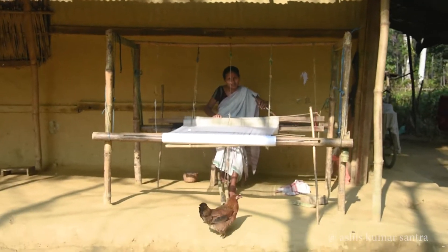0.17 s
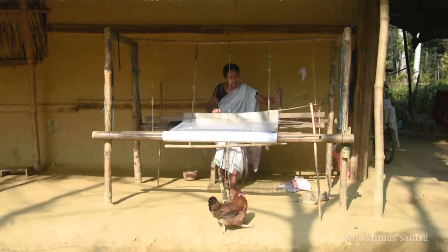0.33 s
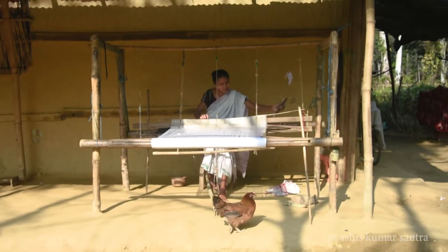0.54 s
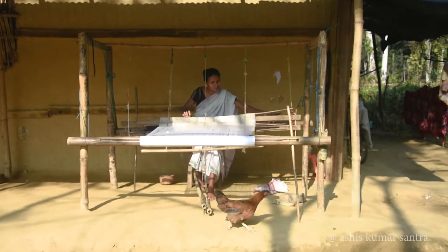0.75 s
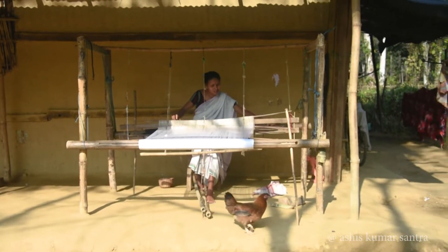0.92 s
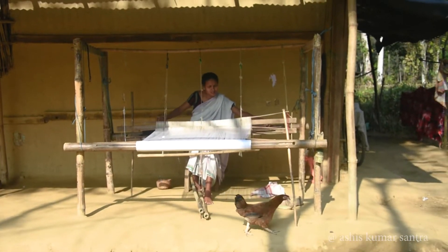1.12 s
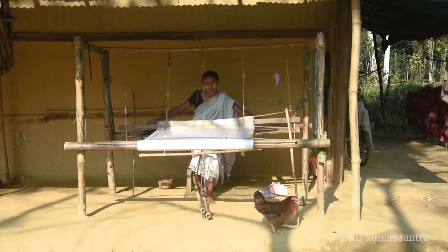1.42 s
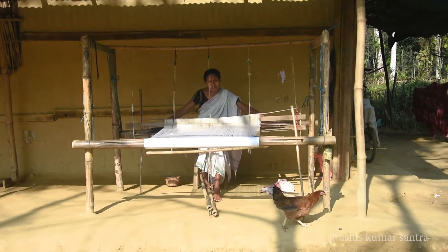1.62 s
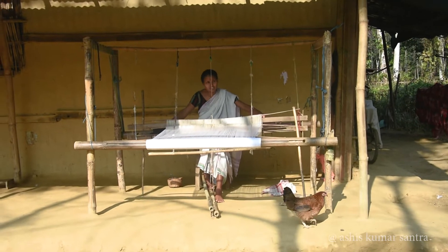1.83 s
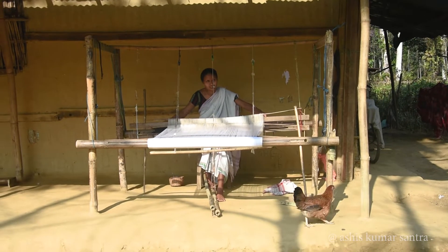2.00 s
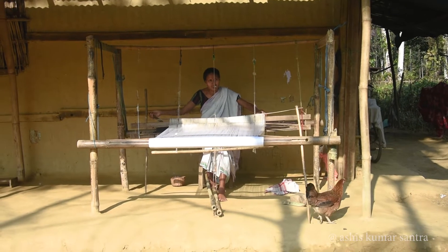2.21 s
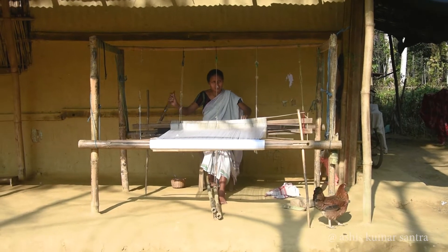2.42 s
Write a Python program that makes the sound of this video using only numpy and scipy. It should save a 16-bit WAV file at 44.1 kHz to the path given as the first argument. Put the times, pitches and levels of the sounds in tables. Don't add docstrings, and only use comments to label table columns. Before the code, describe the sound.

A wooden handloom, close and dry on an open veranda. A tiny hen cluck and stick tick at 0.03 s; a loud, ringing knock at 0.23 with bouncing rebound at 0.28; a crisp reed slap at 0.6. Softer knock and creak near 1.2, dry ticks 1.45-1.77, shuttle clacks and bobbin rattle 2.1-2.5. Faint rustles, birds, insect buzz fading after 1.1, soft hush, thin high whine.

```python
import sys
import numpy as np
from scipy import signal
from scipy.fft import rfft, irfft
from scipy.io import wavfile
from scipy.ndimage import uniform_filter1d

SR = 44100
rng = np.random.default_rng(int(sys.argv[2]) if len(sys.argv) > 2 else 0)


def level_to_linear(level):
    exponent = np.asarray(level, float) / 20
    return 10 ** exponent


def transcribe(signal):
    frames = np.atleast_2d(signal).T
    limited = np.clip(frames, -1, 1)
    pcm = np.round(limited * 32767).astype(np.int16)
    wavfile.write(sys.argv[1], SR, pcm)


N = 112454

# [f/Hz, level/dB, t60/s]
STICK_MODES = [(1710, -12, .01), (2560, -10, .01), (3710, 0, .011), (10000, -8, .005)]
# [f/Hz, density/dB]
STICK_CRACK = [(290, -60), (500, -26), (3690, -3), (4660, -7), (10900, -15), (16400, -38)]
# [f/Hz, density/dB]
THREAD_CRACK = [(500, -44), (3700, -13), (6000, 0), (10000, 7), (14000, -6.5), (16400, -17)]


def evened(x):
    return x / np.sqrt(np.mean(x ** 2) + 1e-20)


def read(points, hz):
    f, value = np.transpose(points)
    return np.interp(np.log(hz + 1), np.log(f + 1), value)


def curve(points):
    return level_to_linear(np.interp(np.arange(N) / SR, *np.transpose(points)))


def add(mix, s, sound):
    part = mix[round(s * SR):][:len(sound)]
    part += sound[:len(part)]


def coloured(x, db_at):
    gain = level_to_linear(db_at(np.fft.rfftfreq(len(x), 1 / SR)))
    return evened(irfft(rfft(x) * gain, len(x)))


def resonate(x, hz, width_hz):
    turn = np.exp(2j * np.pi * hz * np.arange(len(x)) / SR)
    r = np.exp(-np.pi * width_hz / SR)
    return 2 * (turn * signal.lfilter([1 - r], [1, -r], x / turn)).real


def arch(t, length, rise):
    u = np.clip(t / length, 0, 1)
    return np.sin(np.pi / 2 * np.minimum(u / rise, (1 - u) / (1 - rise))) ** 2


def thin(x, hz):
    return signal.sosfilt(signal.butter(4, hz, "high", fs=SR, output="sos"), x)


def strikes(events, modes, snap, spread, contacts_per_s, abrupt, freed, size):
    out, length = np.zeros(N), 8192
    t = np.arange(length) / SR
    lead = 40
    for s, db, chatter, snap_db in events:
        fade = np.exp(-(t / max(chatter, 3e-4)) ** abrupt)
        touching = rng.random(length) < contacts_per_s / SR
        contacts = rng.standard_normal(length) * touching * fade
        contacts[0] = 2.5
        tune = 1 + spread * rng.standard_normal(len(modes))
        ring = np.zeros(length)
        for (hz, level, t60), k in zip(modes, tune):
            ring += level_to_linear(level - 60 * t / t60) * np.sin(2 * np.pi * hz * k * t)
        soft_contacts = signal.fftconvolve(contacts, np.hanning(size))
        ring = signal.fftconvolve(soft_contacts, ring)[:length]
        ring *= freed + (1 - freed) * fade
        crack = coloured(rng.standard_normal(length) * fade + contacts, lambda hz: read(snap, hz))
        ring, crack = np.roll(ring, lead), np.roll(crack, lead)
        blow = ring / abs(ring).max() + level_to_linear(snap_db) * crack / abs(crack).max()
        add(out, s - lead / SR, level_to_linear(db) * blow / abs(blow).max())
    return out


def beater():
    # [t/s, peak level/dB, chatter/s, snap re ring/dB]
    knocks = [
        (0.228, 2.5, 0.015, -10),
        (0.2355, -7, 0.013, -5.5),
        (1.2095, -18.5, 0.01, -10),
        (1.2202, -25, 0.0025, 9),
        (1.2238, -23, 0.02, -2),
    ]
    # [t/s, peak level/dB, chatter/s, snap re ring/dB]
    rebounds = [
        (0.2805, -5.5, 0.007, -3),
        (0.2845, -3.5, 0.011, -2.5),
        (0.2905, -7, 0.01, -5),
        (0.2985, -16, 0.019, 0.5),
        (0.345, -26.5, 0.022, 5),
        (0.399, -26, 0.035, -7),
        (1.302, -27.5, 0.006, 15),
        (1.306, -24.5, 0.018, -6),
    ]
    # [f/Hz, level/dB, t60/s]
    beam_modes = [(630, -24, .07), (930, -15, .09), (1430, 0, .055), (1745, -3, .09), (2020, -7, .07),
                  (2120, -9, .05), (2385, -8, .09), (2720, -8, .07), (3060, -12, .07), (3380, -17, .07)]
    post_modes = [(775, -11, .06), (935, -12, .09), (1445, -10, .1), (1535, -15, .1), (1755, 0, .065),
                  (2025, -7, .08), (2190, -14, .09), (2380, -10, .085), (3050, -18, .08), (3320, -17, .08)]
    # [f/Hz, density/dB]
    beam_crack = [(400, -43), (900, -11), (1700, -6.5), (3300, -16), (4500, -34), (16000, -46.5)]
    return (strikes(knocks, beam_modes, beam_crack, spread=0.0016, contacts_per_s=270,
                    abrupt=15.0, freed=0.21, size=14)
            + strikes(rebounds, post_modes, beam_crack, spread=0.0041, contacts_per_s=300,
                      abrupt=3.6, freed=0.84, size=14))


def reed_slap():
    # [t/s, peak level/dB, chatter/s, snap re ring/dB]
    slaps = [
        (0.588, -14.5, 0.027, 25),
        (0.592, -13, 0.017, 1),
        (0.6, -7, 0.0073, 24),
        (0.635, -22.5, 0.017, 8),
        (0.81, -26.5, 0.014, 1.5),
    ]
    # [f/Hz, level/dB, t60/s]
    frame_modes = [(980, -3, 0.045), (1380, 0, 0.05), (1540, 0, .05), (1810, -2, .05), (2010, -3, 0.05),
                   (2500, -6, 0.04)]
    # [f/Hz, density/dB]
    reed_crack = [(120, -40), (250, -17), (986, -1.5), (2420, -7.5), (5730, -1.5), (12600, -13),
                  (16000, -23)]
    return strikes(slaps, frame_modes, reed_crack, spread=0.0144, contacts_per_s=1300,
                   abrupt=0.99, freed=1.0, size=8)


def shuttle():
    # [t/s, peak level/dB, chatter/s, snap re ring/dB]
    clacks = [
        (1.0924, -22, 0.01, -9.5),
        (2.0911, -21, 0.0026, 0),
        (2.0974, -20, 0.0026, -2.5),
        (2.1335, -28, 0.0054, -2),
        (2.3106, -22.5, 0.0033, 3),
        (2.3255, -24.5, 0.015, -10.5),
    ]
    # [f/Hz, level/dB, t60/s]
    rod_modes = [(2375, 0, .033), (3420, -9, .025), (5060, 0, .03), (5260, -1, .028)]
    return strikes(clacks, rod_modes, STICK_CRACK, spread=0.0048, contacts_per_s=360,
                   abrupt=0.59, freed=1.0, size=4)


def bobbin_rattle():
    # [t/s, peak level/dB]
    rattles = [(2.1205, -38), (2.149, -39), (2.158, -40), (2.2853, -38), (2.3046, -23), (2.316, -23.5),
               (2.333, -35), (2.3587, -35), (2.376, -39), (2.407, -34), (2.414, -36), (2.437, -37),
               (2.46, -36), (2.4769, -36), (2.492, -42), (2.505, -36)]
    # [f/Hz, level/dB, t60/s]
    bobbin_modes = [(2380, -9, .025), (5100, 0, .016), (5280, -1, .016), (8600, -5, .014),
                    (9900, -12, .012)]
    events = [(s, db, 0.006, -8) for s, db in rattles]
    return strikes(events, bobbin_modes, THREAD_CRACK, spread=0.0061, contacts_per_s=900,
                   abrupt=1.7, freed=1.0, size=3)


def stick_ticks():
    # [t/s, peak level/dB, snap re ring/dB]
    tick_times = [(0.0388, -15.5, 23), (0.042, -18.5, -2.5), (1.2094, -20.5, 18), (1.4655, -32, -5),
                  (1.487, -26, -10), (1.5514, -22, 5), (1.5564, -19.5, 0.5), (1.5614, -21.5, 3),
                  (1.6706, -34.5, 0), (1.6916, -29.5, 10), (1.7044, -30.5, 3), (1.7534, -27.5, 4),
                  (1.7614, -18.5, 1), (1.7654, -21.5, 4)]
    events = [(s, db, .0022, snap_db) for s, db, snap_db in tick_times]
    return strikes(events, STICK_MODES, STICK_CRACK, spread=0.019, contacts_per_s=2900,
                   abrupt=4.5, freed=1.0, size=3)


def thread_plucks():
    # [t/s, peak level/dB]
    pluck_times = [(1.445, -28), (1.468, -33), (1.4875, -26.5), (1.552, -30), (1.5603, -31), (1.653, -30),
                   (1.665, -41), (1.6916, -25.5), (1.734, -33), (1.7516, -27), (1.7654, -31), (2.184, -38)]
    events = [(s, db, .0022, 10.5) for s, db in pluck_times]
    return strikes(events, STICK_MODES, THREAD_CRACK, spread=0.03, contacts_per_s=4600,
                   abrupt=0.72, freed=0.99, size=3)


def creak():
    # [f/Hz, width/Hz, level/dB]
    treadle_modes = [(425, 30, -3), (915, 22, 0), (1530, 40, -6), (1730, 50, -7), (1920, 60, -8)]
    out, t = np.zeros(N), np.arange(8192) / SR
    slips_per_s = 900
    slips = rng.standard_normal(8192) * (rng.random(8192) < slips_per_s / SR)
    body = sum(level_to_linear(db) * evened(resonate(slips, hz, width)) for hz, width, db in treadle_modes)
    swell = arch(t, .105, 0.083) ** 0.35
    add(out, 1.22, level_to_linear(-37.5) * evened(body) * swell)
    return out


def rustles():
    # [start t/s, length/s, level/dB, centre f/Hz, spread/octaves]
    rubs = [(0.272, 0.072, -33, 4200, 0.43), (2.359, 0.025, -49, 8000, 0.72), (2.402, 0.043, -47, 8450, 1),
            (2.434, 0.033, -46.5, 11000, 0.88), (0.04, 0.12, -45, 2780, 1.5),
            (0.541, 0.067, -42.5, 1670, 0.55), (0.589, 0.17, -40, 3000, 0.95),
            (0.649, 0.044, -34.5, 1760, 0.42), (0.701, 0.033, -39, 2220, 0.23),
            (0.762, 0.022, -42, 1880, 0.22), (0.798, 0.049, -39, 2050, 0.5),
            (1.18, 0.035, -39.5, 3100, 0.68), (1.181, 0.03, -35.5, 6100, 0.28),
            (1.231, 0.15, -37.5, 1540, 1.53), (1.293, 0.083, -41.5, 6850, 0.69),
            (1.354, 0.068, -41, 6700, 0.36), (1.452, 0.085, -43.5, 3150, 0.83),
            (1.663, 0.017, -43, 4040, 1.2), (1.702, 0.097, -44.5, 3750, 0.14),
            (1.713, 0.12, -44, 1410, 1.56), (1.945, 0.15, -49, 1690, 1.62), (2.174, 0.073, -45, 7000, 0.75),
            (2.278, 0.19, -47, 5740, 1.5), (2.486, 0.11, -47.5, 5050, 0.96),
            (1.209, 0.033, -32, 5060, 0.96)]
    out, t = np.zeros(N), np.arange(10240) / SR
    grain_db, rise = 3, .2
    for s, length, db, centre_hz, octaves in rubs:
        grain = level_to_linear(grain_db * evened(uniform_filter1d(rng.standard_normal(10240), size=90)))
        rub = coloured(rng.standard_normal(10240),
                       lambda hz: -6 * (np.log2((hz + 1) / centre_hz) / octaves) ** 2)
        add(out, s, level_to_linear(db) * rub * grain * arch(t, length, rise))
    return out


def veranda(x):
    # [f/Hz, t60/s]
    decay_times = [(500, 0.25), (2500, 0.21), (9000, 0.15)]
    taps = np.zeros(SR // 2)
    at = np.arange(200, len(taps) - 20, 20)
    taps[at + rng.integers(0, 20, len(at))] = rng.choice([-1., 1.], len(at))
    hz, t, z = signal.stft(taps, SR, nperseg=256)
    fall = level_to_linear(-60 * t / read(decay_times, hz)[:, None])
    tail = signal.istft(z * fall, SR, nperseg=256)[1]
    return signal.fftconvolve(x, tail / np.linalg.norm(tail))[:N]


def hen():
    # [f/Hz, level/dB]
    throat = [(500, -21), (780, -5), (1030, -9.5), (1400, 2.5), (1850, -10.5), (2600, -21), (5000, -39)]
    out, t = np.zeros(N), np.arange(4096) / SR
    pitch_hz, breath = 258, .15
    voice = np.zeros(4096)
    for k in range(1, 14):
        voice += level_to_linear(read(throat, k * pitch_hz)) * np.cos(2 * np.pi * k * pitch_hz * t)
    rasp = coloured(rng.standard_normal(4096), lambda hz: read(throat, hz))
    add(out, .024, level_to_linear(-33) * (evened(voice) + breath * rasp) * arch(t, .03, 0.27) ** .5)
    return out


def whistles(notes, blur):
    out, t = np.zeros(N), np.arange(8000) / SR
    for s, length, db, hz, glide_hz in notes:
        waver = blur * evened(uniform_filter1d(rng.standard_normal((2, 8000)), size=200, axis=1))
        pitch_hz = (hz + glide_hz * t / length) * (1 + .05 * waver[0])
        tone = np.sin(2 * np.pi * np.cumsum(pitch_hz) / SR)
        add(out, s, level_to_linear(db + 3 + 20 * waver[1]) * tone * arch(t, length, .25) ** .5)
    return out


def birds():
    # [start t/s, length/s, level/dB, pitch f/Hz, glide/Hz]
    chip_notes = [(.09, 0.14, -54.5, 1415, -1), (1.926, 0.032, -46.5, 7150, -2),
                  (2.11, 0.081, -61, 12300, 0), (2.21, 0.068, -63, 12650, 2), (2.37, 0.011, -45, 8660, 0),
                  (2.396, 0.0052, -38, 8440, 0), (2.434, .008, -41, 7800, -300), (2.44, .007, -37, 7300, 0),
                  (2.445, 0.028, -46, 7280, -200), (2.513, 0.015, -41.5, 5940, -200),
                  (.796, 0.024, -32.5, 2070, -4), (2.512, 0.036, -48, 1780, 6)]
    # [start t/s, length/s, level/dB, pitch f/Hz, glide/Hz]
    coo_notes = [
        (.085, 0.062, -54, 557, 10),
        (.14, 0.067, -55.5, 333, -35),
        (.85, 0.041, -51, 635, 30),
        (.915, 0.15, -58.5, 653, 33),
    ]
    return whistles(chip_notes, blur=.2) + whistles(coo_notes, blur=.15)


def insect():
    # [t/s, level/dB]
    buzz_level = [
        (0, -53),
        (.3, -52.5),
        (1.05, -52),
        (1.12, -63),
        (2.55, -65),
    ]
    t = np.arange(N) / SR
    buzz_hz, width_hz, throbs_per_s = 6390, 200, 52
    buzz = resonate(rng.standard_normal(N), buzz_hz, width_hz)
    buzz = resonate(buzz, buzz_hz, 2 * width_hz)
    buzz = buzz / np.sqrt(abs(signal.hilbert(buzz)) + 1e-9)
    throb = 1 + .3 * np.sin(2 * np.pi * throbs_per_s * t)
    return curve(buzz_level) * evened(buzz * throb)


def air(colour, patchy_db, flicker_db):
    frames = N // 128 + 5
    a, b, patches = rng.standard_normal((frames, 257, 3)).T
    patches = uniform_filter1d(patches, size=8, axis=0)
    patches = evened(uniform_filter1d(patches, size=14, axis=1))
    flicker = evened(uniform_filter1d(rng.standard_normal(frames), size=6))
    z = (a + 1j * b) * level_to_linear(patchy_db * patches + flicker_db * flicker)
    noise = signal.istft(z, nperseg=512, noverlap=384)[1][:N]
    return coloured(noise, lambda hz: read(colour, hz))


def loom_stir():
    # [t/s, level/dB]
    stir_level = [(0, -49.5), (.2, -47), (.45, -48.5), (1.05, -45.5), (1.38, -44.5), (1.43, -52.5),
                  (1.62, -59.5), (1.8, -49), (2.05, -65.5), (2.3, -47.5), (2.55, -53.5)]
    # [f/Hz, density/dB]
    stir_colour = [(120, -35), (200, -12), (2040, -1.5), (5440, -9), (6290, -6), (15300, -15.5)]
    return curve(stir_level) * air(stir_colour, patchy_db=1.5, flicker_db=1.6)


def outdoor_hush():
    # [f/Hz, density/dB]
    hush_colour = [(25, -37.5), (300, -5), (800, -4.5), (3600, -9.5), (7000, -7), (9000, -28.5),
                   (15700, -21.5)]
    return level_to_linear(-54.5) * air(hush_colour, patchy_db=1.9, flicker_db=0.8)


def electronic_whine():
    # [t/s, level/dB]
    whine_level = [
        (0, -63),
        (1.42, -63),
        (1.56, -69),
        (1.57, -57),
        (2.55, -56),
    ]
    return curve(whine_level) * np.sin(2 * np.pi * 15677 * np.arange(N) / SR)


def scene():
    wood = thin(beater() + shuttle() + bobbin_rattle(), 605)
    bamboo = thin(reed_slap() + creak(), 256)
    loom = wood + bamboo + hen()
    ticks = thin(stick_ticks() + thread_plucks(), 605)
    room = level_to_linear(-9) * veranda(loom + 0.17 * ticks)
    close = loom + ticks + room + thin(rustles(), 185)
    around = birds() + insect() + loom_stir() + outdoor_hush()
    return (close + around)[None]


def roll_off(x):
    return signal.sosfilt(signal.butter(12, 16500, fs=SR, output="sos"), x)


def record(dry):
    limited = np.sign(dry) * (.8 + .15 * np.tanh((abs(dry) - .8) / .15))
    dry = np.where(abs(dry) < .8, dry, limited)
    below_edge = signal.oaconvolve(dry, signal.firwin(301, 15750, fs=SR)[None], "same")
    mix = below_edge + .15 * (dry - below_edge) + electronic_whine()
    return roll_off(mix)


dry = scene()
out = record(dry)
transcribe(out)
```